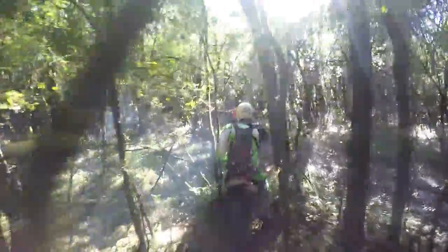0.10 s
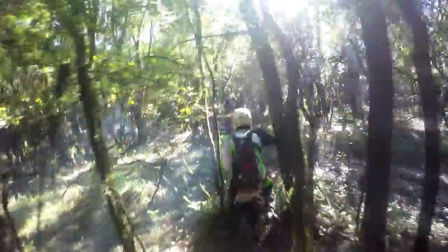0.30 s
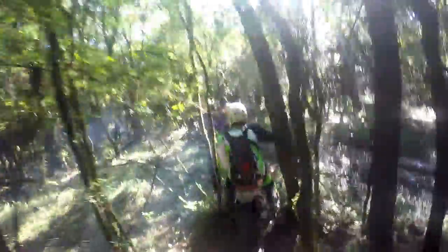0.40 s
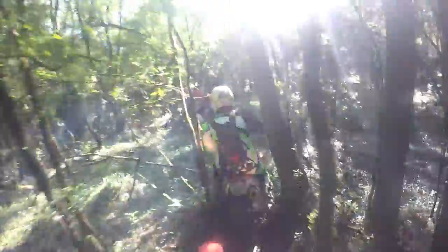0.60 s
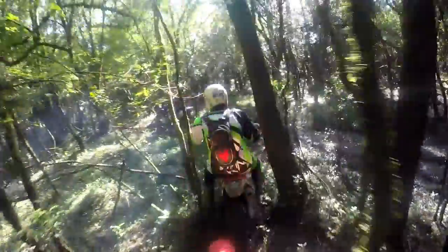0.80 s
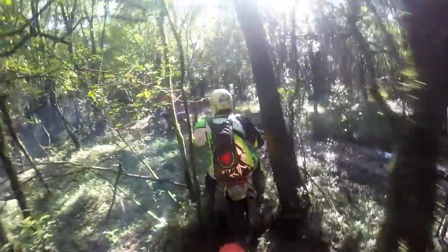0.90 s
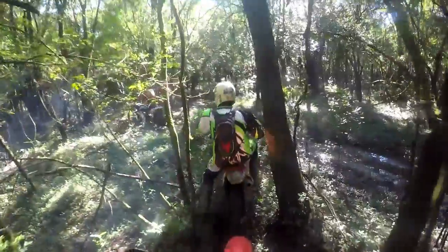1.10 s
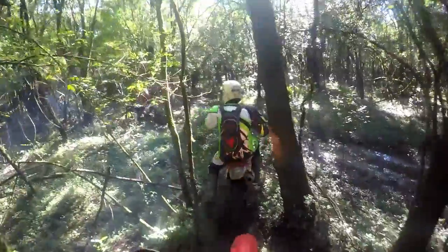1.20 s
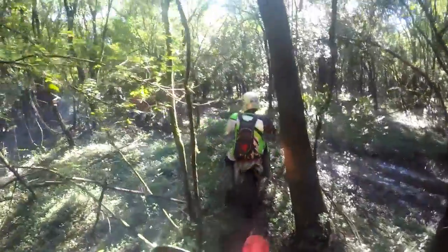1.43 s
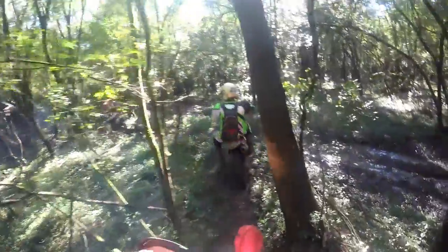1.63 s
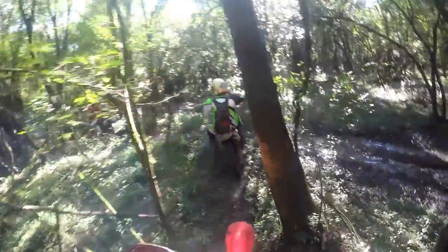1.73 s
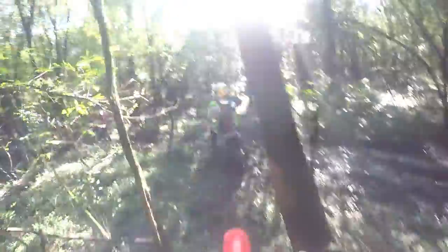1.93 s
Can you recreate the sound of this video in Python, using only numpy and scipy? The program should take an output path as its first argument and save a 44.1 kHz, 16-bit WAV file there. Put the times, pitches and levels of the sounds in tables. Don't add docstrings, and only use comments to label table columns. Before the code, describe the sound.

Single-cylinder trail motorcycle engine blips its throttle three times, then drops to clattery, ticking idle

```python
import sys
import numpy as np
from scipy import signal
from scipy.fft import rfft, irfft
from scipy.io import wavfile
from scipy.ndimage import uniform_filter1d

SR = 44100
rng = np.random.default_rng(int(sys.argv[2]) if len(sys.argv) > 2 else 0)


def generate_wav(sig):
    pcm = np.round(np.clip(np.atleast_2d(sig).T, -1, 1) * 32767).astype(np.int16)
    wavfile.write(sys.argv[1], SR, pcm)


def how_loud(loudness_db):
    steps = np.asarray(loudness_db, float) / 20
    return 10 ** steps


N = 85995
T = np.arange(N) / SR
FULL_DB = -15

# (time [s], firing rate [1/s])
CRANK_SPEED = [(0.0, 22.06), (0.0983, 24.31), (0.382, 27.17), (0.4351, 21.04), (0.4806, 22.79),
               (0.6189, 28.6), (0.8306, 45.64), (0.8583, 41.7), (0.9347, 37.43), (0.9808, 43.15),
               (1.0656, 47.85), (1.177, 38.38), (1.204, 32.77), (1.3355, 37.57), (1.3802, 45.36),
               (1.4227, 26.15), (1.578, 24.02), (1.95, 16.32)]
# (time [s], firing strength [dB], harshness of the gas crack [dB])
THROTTLE_HAND = [(0, -39, 6), (.39, -56, .1), (.436, -28, 6), (.5, -22, 0.5), (.56, -20, 1.5),
                 (.635, -19.5, 0.5), (.7, -15, 1.5), (.845, -14.5, -2.5), (.867, -38, 2),
                 (.891, -19.5, -2.5), (.917, -24, -0.5), (.97, -13, 0), (1.079, -16.5, -3.5),
                 (1.099, -58, -11), (1.195, -32, .1), (1.25, -18, -0.1), (1.335, -18, -2),
                 (1.395, -46.5, 11.5)]
# (frequency [Hz], density [dB per Hz])
FRAME_SPECTRUM = [(12, -8), (20, -6.5), (81, -7), (161, -5), (185, -22.5), (238, -10), (414, -27),
                  (500, -66), (650, -36), (1100, -120)]
# (level [dB], gain per doubling of speed [dB], phase [turns])
SHAFT_ORDERS = [(-42, 15, 0.11), (-37, -14, 0.24), (-40.5, 3, 0.62), (-43, 7, 0.23)]
# (frequency [Hz], width [Hz], level [dB])
GEAR_MODES = [(994, 450, 9), (1260, 180, -20), (1530, 280, 4.5), (2037, 100, 1.5), (2574, 550, 0),
              (3650, 67, 5.5), (3960, 100, -6), (7250, 1160, -13.5)]
# (frequency [Hz], density [dB per Hz])
GEAR_WASH = [(260, -10), (450, -2.5), (814, -11), (1540, -1), (2260, -10.5), (2820, 0.5), (3320, -11.5),
             (4270, -7.5), (15500, -36)]
# (time [s], peak level [dB])
TAPPET_TAPS = [
    (0.0397, -40),
    (0.0822, -35),
    (0.1216, -28),
    (0.1635, -30),
    (0.2044, -31.5),
    (0.3183, -37),
    (1.6684, -31),
    (1.7492, -33.5),
]
# (frequency [Hz], width [Hz], level [dB])
TAPPET_MODES = [(1566, 120, -7.5), (2660, 146, -0.5), (4570, 580, -9), (6970, 1360, -19.5)]
# (start [s], length [s], pitch [Hz], level [dB])
BRAKE_SQUEAKS = [
    (1.553, 0.019, 2080, -35.5),
    (1.584, 0.026, 2090, -36),
    (1.606, 0.05, 2080, -40.5),
    (1.644, 0.075, 2070, -43.5),
    (1.706, 0.037, 2000, -45),
    (1.725, 0.051, 1830, -43),
    (1.866, 0.041, 2070, -43),
]
# (frequency [Hz], width [Hz], level [dB], gain per doubling of speed [dB])
CASE_MODES = [(1030, 190, -4, -2.5), (1191, 138, -1, -2.3), (1523, 192, 1.5, 9.5), (1902, 300, -4.5, -1),
              (2647, 314, -2, -2), (3550, 1060, -13.5, -3.5), (4780, 790, -9, -2), (6025, 280, -15, 1),
              (6960, 920, -20, 0.5), (9800, 3350, -37, 0)]
# (frequency [Hz], width [Hz], level [dB], share of throttle change followed [ratio])
PIPE_MODES = [(89, 77, -4, 0.32), (199, 125, -3.5, 0.27), (385.5, 89, 6.5, 1.1), (570, 373, 11.5, 1.05)]


def evened(x):
    return x / np.sqrt(np.mean(x ** 2) + 1e-20)


def curve(table, column=1):
    return np.interp(T, *np.transpose(table)[[0, column]])


def resonate(x, hz, width):
    pole = np.exp((2j * np.pi * hz - np.pi * width) / SR)
    return 2 * signal.lfilter([1 - abs(pole)], [1, -pole], x).real


def coloured(points):
    hz = np.fft.rfftfreq(N, 1 / SR) + 1
    f, db = np.transpose(points)
    octaves_outside = np.maximum(np.log2(hz / f[-1]), 0) + np.maximum(np.log2(f[0] / hz), 0)
    level_db = np.interp(np.log(hz), np.log(f), db) - 30 * octaves_outside
    return evened(irfft(rfft(rng.standard_normal(N)) * how_loud(level_db), N))


def puff(delay_s, rise_s, fall_s):
    t = np.maximum(np.arange(3000) / SR - delay_s, 0)
    return (1 - np.exp(-t / rise_s)) * np.exp(-t / fall_s)


def click(delay_s):
    return np.sinc(0.5 * (np.arange(400) - delay_s * SR))


def played(at, size, shape):
    train = np.zeros(N)
    train[at] = size
    return signal.oaconvolve(train, shape)[:N]


def rumble(turns, pace):
    lumps = evened(uniform_filter1d(uniform_filter1d(rng.standard_normal(N), 900), 900))
    beat_db = 2 * np.cos(2 * np.pi * (turns - 0.13))
    shake = evened(coloured(FRAME_SPECTRUM) * how_loud(1.2 * lumps + beat_db))
    out = how_loud(-37 + 8.5 * pace) * shake
    for k, (db, speed_db, turn) in enumerate(SHAFT_ORDERS):
        waver_db = 4.2 * np.roll(lumps, 9000 * k)
        hum = np.cos(2 * np.pi * ((k + 2) * turns - turn))
        out += how_loud(db + speed_db * pace + waver_db) * hum
    return out


def chain(at):
    hz, width, peak_s, span_s = 8100, 700, 1.51, 0.16
    rolling = 0.26 + np.exp(-((at / SR - peak_s) / span_s) ** 2)
    tug = rolling * how_loud(2.8 * rng.standard_normal(len(at)))
    burst = rng.standard_normal(N) * played(at, tug, puff(0.0037, 0.002, 0.011))
    return how_loud(-65) * evened(resonate(resonate(burst, hz, width), hz, 3 * width))


def clatter(at, pace):
    ticks = played(at, how_loud(4 + 3.5 * rng.standard_normal(len(at))), puff(0.003, 0.001, 0.008))
    grit_db = 3.4 * evened(uniform_filter1d(rng.standard_normal(N), 150))
    grit = rng.standard_normal(N) * how_loud(grit_db) * (1 + ticks)
    ring = np.zeros(N)
    for k, (hz, width, db) in enumerate(GEAR_MODES):
        ring += (-1) ** k * how_loud(db) * resonate(resonate(grit, hz, width), hz, 2.25 * width)
    wash = coloured(GEAR_WASH) * (1 + 0.44 * ticks)
    return how_loud(2.5 * pace) * (how_loud(-47.5) * evened(ring) + how_loud(-44) * wash)


def tappet():
    start_s, db = np.transpose(TAPPET_TAPS)
    taps = played((start_s * SR).astype(int), how_loud(db + 0.5), puff(0, 0.00079, 0.0019))
    burst = rng.standard_normal(N) * taps
    out = np.zeros(N)
    for hz, width, mode_db in TAPPET_MODES:
        out += how_loud(mode_db) * np.sqrt(SR / 300) * resonate(resonate(burst, hz, width), hz, 2.35 * width)
    return out


def brake():
    rasp = evened(uniform_filter1d(rng.standard_normal((2, N)), 60, axis=1))
    out = np.zeros(N)
    for start, length, hz, db in BRAKE_SQUEAKS:
        part = np.clip((T - start) / length, 0, 1)
        pitch = hz * (1.015 - 0.026 * part + 0.0203 * rasp[0])
        angle = 2 * np.pi * np.cumsum(pitch) / SR
        out += how_loud(db) * np.sin(np.pi * part) * (0.47 * np.sin(angle) + 0.75 * np.sin(2 * angle))
    return out * (1 + 0.6 * rasp[1])


def intake(at, load_db):
    hz, width, knee_db, steepness = 13400, 2800, -30, 3
    opening_db = steepness * np.minimum(load_db + FULL_DB - knee_db, 0) + 0.1 * load_db
    air = evened(resonate(resonate(rng.standard_normal(N), hz, width), hz, width))
    gulp = how_loud(opening_db + 3 * rng.standard_normal(len(at)))
    return how_loud(-40) * air * played(at, gulp, puff(0.0004, 0.00072, 0.0028))


def bark(at, load_db, pace):
    hz, width = 1520, 610
    turn_db = 3.5 * (-1.0) ** np.arange(len(at))
    speed_db = 14 * (pace[at] - 1.44)
    size_db = -3.5 + 1.387 * load_db + speed_db + turn_db + 2.8 * rng.standard_normal(len(at))
    knock = played(at, how_loud(size_db), click(0.003609) / 2)
    return -resonate(resonate(knock, hz, width), hz, 3 * width) * SR / (2 * np.pi * width)


def cracks(at, load_db, pace):
    delay_s, snap_top_hz = 0.0003, 2280
    shape = puff(delay_s, 0.0012, 0.0023) + how_loud(-12.5) * puff(delay_s, 0.0051, 0.014)
    snap = click(0.002814)
    mix_db = 2.5 * rng.standard_normal((len(at), len(CASE_MODES)))
    gas = rng.standard_normal(N)
    harsh_db = curve(THROTTLE_HAND, column=2)[at]
    cycle = np.maximum(np.searchsorted(at, np.arange(N), "right") - 1, 0)
    out = np.zeros(N)
    for k, (hz, width, db, speed_db) in enumerate(CASE_MODES):
        size = how_loud(1.387 * load_db + harsh_db + mix_db[:, k] + speed_db * (pace[at] - 0.72))
        flow = played(at, size, shape)
        snap_share = how_loud(5) / (1 + (hz / snap_top_hz) ** 4)
        burst = gas * flow + snap_share * played(at, size, snap)
        ring = resonate(resonate(burst, hz, width), hz, 1.43 * width)
        luck = np.bincount(cycle, ring ** 2) / np.bincount(cycle, flow ** 2 + 1e-20)
        steady = (luck / np.median(luck) + 1e-9) ** -0.4
        out += (-1) ** k * how_loud(db) * np.sqrt(SR / 300) * ring * steady[cycle]
    return how_loud(-14) * out


def thumps(at, load_db):
    delay_s, width_s = 0.0021, 0.00042
    step = np.exp(-0.5 * ((np.arange(400) / SR - delay_s) / width_s) ** 2)
    step /= step.sum()
    wobble_db = 1.15 * rng.standard_normal((len(at), len(PIPE_MODES)))
    out = np.zeros(N)
    for k, (hz, width, db, follow) in enumerate(PIPE_MODES):
        push = played(at, how_loud(db + follow * load_db + wobble_db[:, k]), step)
        rounded = signal.lfilter(*signal.butter(1, 0.63 * hz, fs=SR), push)
        out += resonate(rounded, hz, width) * SR / (2 * np.pi * width)
    return how_loud(-9) * out


def scene():
    speed = curve(CRANK_SPEED)
    turns = 0.1714 + np.cumsum(speed) / SR
    pace = np.log2(speed / 24)
    at = np.flatnonzero(np.diff(np.floor(turns)))
    load_db = curve(THROTTLE_HAND)[at] - FULL_DB + 0.5 * rng.standard_normal(len(at))
    background = rumble(turns, pace) + chain(at) + clatter(at, pace) + tappet() + brake()
    engine = intake(at, load_db) + bark(at, load_db, pace) + cracks(at, load_db, pace) + thumps(at, load_db)
    return (background + engine)[None]


def band_limit(x):
    return signal.sosfilt(signal.butter(12, 15740, fs=SR, output="sos"), x)


def record(dry):
    cased = dry - 0.58 * resonate(dry, 799, 129)
    rounded = 1.667 * np.tanh(cased / 1.523)
    low_cut = signal.butter(2, 28, "high", fs=SR, output="sos")
    top_cut = signal.cheby1(10, 1, 15150, fs=SR, output="sos")
    mix = signal.sosfilt(top_cut, signal.sosfilt(low_cut, rounded))
    return band_limit(mix)


dry = scene()
out = record(dry)
generate_wav(out)
```